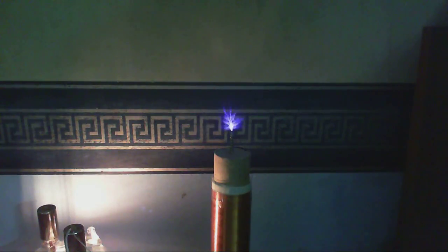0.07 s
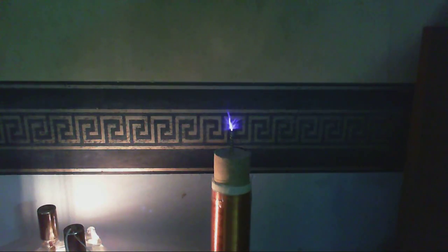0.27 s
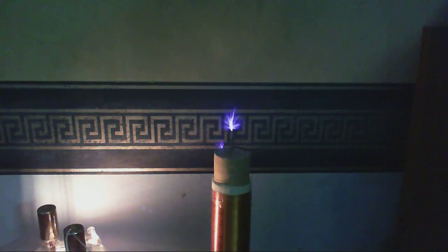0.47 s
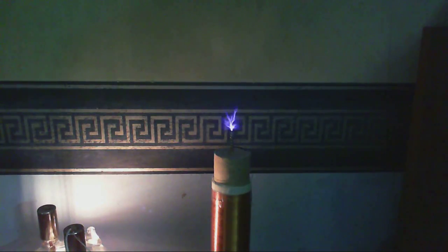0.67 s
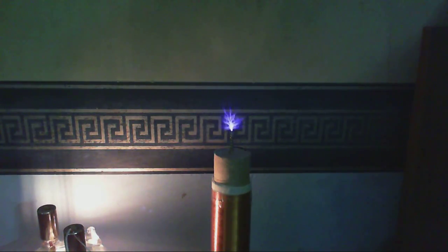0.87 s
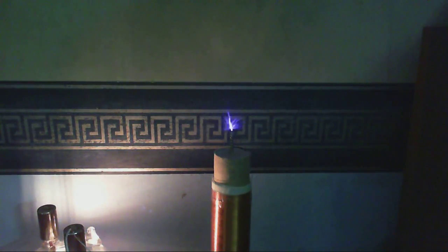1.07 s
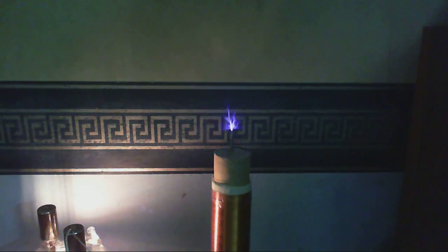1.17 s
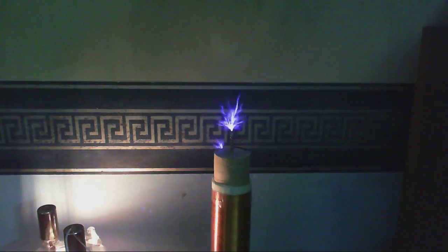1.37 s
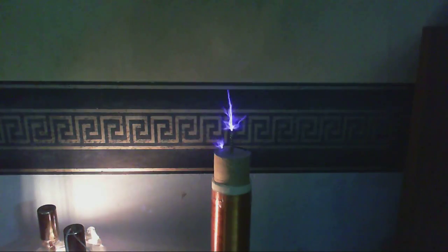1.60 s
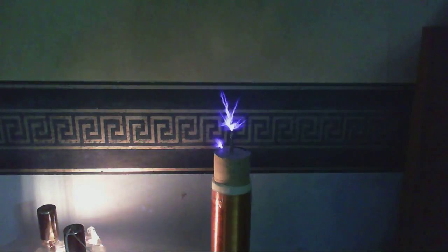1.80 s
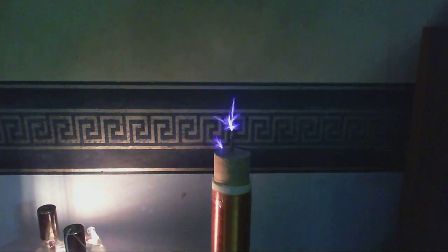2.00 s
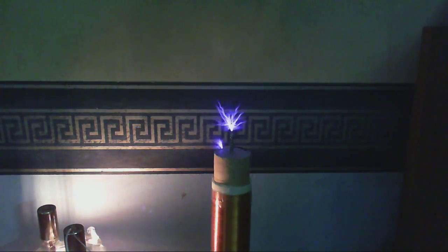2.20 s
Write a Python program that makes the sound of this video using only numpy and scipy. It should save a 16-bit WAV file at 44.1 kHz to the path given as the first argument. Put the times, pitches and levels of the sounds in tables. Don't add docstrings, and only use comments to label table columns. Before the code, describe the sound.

Continuous electrical buzzing and fizzing spark streamers, close to the microphone in a quiet workshop, are briefly broken by a hard, rattling switch click with a short room echo, then resume more strongly until the end.

```python
import sys
import numpy as np
from scipy import signal
from scipy.fft import rfft, irfft, next_fast_len
from scipy.io import wavfile
from scipy.ndimage import uniform_filter1d, map_coordinates

SR = 44100
rng = np.random.default_rng(int(sys.argv[2]) if len(sys.argv) > 2 else 0)


def to_wav(sig):
    pcm = np.clip(np.atleast_2d(sig), -1, 1) * 32767
    pcm = np.round(pcm).astype(np.int16)
    wavfile.write(sys.argv[1], SR, pcm.T)


def ratio_of_db(decibels):
    return 10 ** (np.asarray(decibels, float) / 20)


N = 99136
T = np.arange(N) / SR
MAINS_HZ = 49.88

# (on [s], off [s], instant the discharge cycles are counted from [s])
SETTINGS = [
    (-.1, 1.1362, -.00795),
    (1.169, 2.4, -.00531),
]
# (time [s], level [dB], rise [s], t60 [s])
SNAPS = [
    (1.1671, -11.5, 0.0018, .03),
    (1.17, -20.5, 0.0037, 0.034),
    (1.1734, -21.5, 0.00058, 0.024),
    (1.18, -24, .002, .06),
    (1.187, -27, 0.0019, .11),
]


def unit(x):
    return x / np.sqrt(np.mean(x ** 2) + 1e-20)


def along(points, hz):
    f, v = np.transpose(points)
    return np.interp(np.log(hz + 1), np.log(f + 1), v)


def filtered(x, response):
    m = next_fast_len(N + SR // 2)
    return irfft(rfft(x, m) * response(np.fft.rfftfreq(m, 1 / SR)), m)[:N]


def wobble(rate):
    knots = rng.standard_normal(int(N * rate / SR) + 4)
    return map_coordinates(knots, [T * rate])


def coloured_noise(spectrum, gain=1):
    return unit(filtered(gain * rng.standard_normal(N), lambda hz: ratio_of_db(along(spectrum, hz))))


def patchy(x, depth_db):
    z = signal.stft(x, nperseg=256)[2]
    field = uniform_filter1d(rng.standard_normal(z.shape), size=5, axis=0)
    field = uniform_filter1d(field, size=5, axis=1)
    return unit(signal.istft(z * ratio_of_db(depth_db * unit(field)), nperseg=256)[1][:N])


def resonances(table):
    def response(f):
        total = 0
        for k, (centre, wide, db) in enumerate(table):
            damping = 1j * f * wide
            total = total + (-1) ** k * ratio_of_db(db) * damping / (centre * centre - f * f + damping)
        return total
    return response


def burst(start, db, rise_s, t60_s, release=None):
    release = start if release is None else release
    fall = ratio_of_db(db - 60 * np.maximum(T - release, 0) / t60_s)
    return fall * (1 - np.exp(-np.maximum(T - start, 0) / rise_s))


def supply(levels_db, rise_s, t60_s):
    return sum(burst(on, db, rise_s, t60_s, off) for (on, off, _), db in zip(SETTINGS, levels_db))


def at_low_power():
    return T < SETTINGS[1][0] - .01


def cycles():
    return (T - np.where(at_low_power(), SETTINGS[0][2], SETTINGS[1][2])) * MAINS_HZ


def buzz():
    # (mains multiple, level [dB])
    low = [(1, 1), (2, 1.5), (3, -8), (4, -21.5), (5, -19.5), (6, -20.5), (7, -48), (8, -27.5), (9, -29),
           (10, -27.5), (11, -44), (12, -50), (13, -35), (14, -32.5)]
    high = [(1, -2), (2, 1), (3, -8), (4, -25.5), (5, -16), (6, -19.5), (7, -39), (8, -21.5), (9, -29),
            (10, -36), (11, -51), (12, -41), (13, -47), (14, -32.5)]
    swing_hz, swing_q = 112, 2.5
    levels_db, left_db = [-32.5, -27.5], -32.5

    def stack(rows):
        total = 0
        for k, db in rows:
            hz = k * MAINS_HZ
            lag = np.angle(swing_hz ** 2 - hz ** 2 + 1j * hz * swing_hz / swing_q)
            if k > 3 and k % 2 == 0:
                lag += np.pi
            upper = max(k - 3, 0)
            level = ratio_of_db(db + upper * 0.33 * wobble(11.86)) * np.sqrt(2)
            drift = upper * 0.054 * wobble(8.3)
            total = total + level * np.cos(2 * np.pi * k * cycles() - lag + drift)
        return total

    wave = np.where(at_low_power(), stack(low), stack(high))
    waver = ratio_of_db(0.35 * wobble(40.47)) + 0.012 * wobble(300)
    return wave * waver * (supply(levels_db, 0.0064, 0.0012) + ratio_of_db(levels_db[0] + left_db))


def streamers():
    # (frequency [Hz], level [dB per Hz])
    corona_colour = [(290, 4), (500, 1), (1050, -7.5), (2500, -11), (3540, -8.5), (4660, -7), (9360, -3),
                     (14900, -14), (16000, -43)]
    # (frequency [Hz], level [dB per Hz])
    spit_colour = [(290, -10), (500, -12), (740, -7), (819, -2.5), (1050, -7.5), (2500, -4.5),
                   (3540, -10.5), (9360, -4.5), (16000, -13)]
    # (frequency [Hz], level [dB per Hz])
    plasma_colour = [(15, -34), (25, -5), (107, -6), (168, -9.5), (198, -14), (252, -18), (900, -19),
                     (1170, -68), (1980, -120)]
    strike, rise, die = 0.089, 0.088, 0.32
    second_db, scatter_db, grain_db = -5.5, 1, 2.5

    halves = 2 * (cycles() - strike + 1)
    count = halves.astype(int)
    since = halves % 1 / 2
    scatter = rng.uniform(-2.1, 1, count.max() + 1)[count]
    size = ratio_of_db(scatter_db * scatter + second_db * (count % 2))
    flare = size * (1 - np.exp(-since / rise)) * np.exp(-since / die)

    spit = patchy(coloured_noise(spit_colour, flare * ratio_of_db(grain_db * wobble(1500))), 2)
    corona = patchy(coloured_noise(corona_colour), 1.5) * ratio_of_db(0.96 * wobble(7.96))
    plasma = coloured_noise(plasma_colour, 0.34 + unit(flare))
    return (spit * supply([-44.5, -42.5], 0.0027, 1e-3)
            + corona * supply([-43, -39], 0.0026, 0.037)
            + plasma * supply([-52.5, -50.5], .004, 0.017))


def arc():
    # (frequency [Hz], level [dB per Hz])
    crack_colour = [(500, -40), (900, -2.5), (1700, -2), (2500, -1.5), (3500, -10), (4700, -2.5),
                    (7000, -15.5), (12000, -35)]
    crack_at, crack_wide = .24, .08
    c = cycles() - crack_at + 1.514
    size = ratio_of_db(2 * rng.uniform(-1.6, 1, int(c.max()) + 1)[c.astype(int)])
    pulse = np.exp(-.5 * ((c % 1 - .5) / crack_wide) ** 2)
    return coloured_noise(crack_colour, size * pulse) * supply([-52.5, -50.5], .004, 1e-3)


def bench_colour(sparks):
    # (frequency [Hz], width [Hz], level [dB])
    bench_peaks = [(387, 42, -7.5), (840, 44, -5.5), (2494, 210, -9.5), (4660, 100, -6)]
    return filtered(sparks, lambda f: 1 + resonances(bench_peaks)(f) ** 2 * 4)


def quiet_room():
    # (frequency [Hz], level [dB per Hz])
    floor_colour = [(25, -16), (60, 3), (200, -14), (1000, -8), (4000, -14.5), (9000, -18), (16000, -40)]
    return ratio_of_db(-48.5) * coloured_noise(floor_colour)


def latch_tick():
    impulse = 1. * (np.arange(N + 1) == round(1.1639 * SR))
    return .07 * np.diff(impulse, n=1)


def switch():
    # (frequency [Hz], width [Hz], level [dB])
    case_peaks = [(2130, 37, -1.5), (2480, 174, 3), (3250, 160, -7), (6070, 300, -3), (6990, 130, -7),
                  (7580, 78, 2.5), (9000, 98, -10)]
    # (frequency [Hz], level [dB per Hz])
    body_colour = [(200, -27), (500, -7.5), (1000, -9), (2400, -5), (4200, -4.5), (7570, -3), (10500, -10),
                   (16300, -32)]
    # (frequency [Hz], level [dB], t60 [s])
    panel_modes = [(2182, -5, 0.22), (1540, -3, 0.16), (3235, -11, 0.09)]
    # (frequency [Hz], level [dB], t60 [s])
    thud_modes = [(320, 3, .1), (395, -4, .15), (610, 5, .08), (695, 2, .13), (775, -2, .13),
                  (838, -2, .15), (1090, 1, .1)]

    shake = sum(burst(*snap) for snap in SNAPS)
    t = np.maximum(T - SNAPS[0][0], 0)

    def case(f):
        return ratio_of_db(-5 + along(body_colour, f)) + resonances(case_peaks)(f)

    def ring(modes, level_db):
        return sum(ratio_of_db(level_db + db - 60 * t / t60) * np.sin(2 * np.pi * hz * t + wobble(29.74) / 2)
                   for hz, db, t60 in modes)

    rings = ring(panel_modes, -29) + ring(thud_modes, -34)
    return 4 * filtered(shake * rng.standard_normal(N), case) + rings * (1 - np.exp(-t / 0.0025))


def knob():
    # (frequency [Hz], level [dB], time to peak [s])
    knob_modes = [(2500, -20, .0035), (7600, -21, .004)]
    t = np.maximum(T - SNAPS[0][0], 0)
    total = 0
    for hz, db, peak_s in knob_modes:
        swell = (t / peak_s * np.exp(1 - t / peak_s)) ** 2
        total = total + ratio_of_db(db) * swell * np.sin(2 * np.pi * hz * t + wobble(250) / 2)
    return total


def room(x):
    # (frequency [Hz], t60 [s])
    decay_times = [(200, 0.41), (2000, 0.33), (10000, 0.12)]
    hz, t, z = signal.stft(rng.standard_normal(SR // 2), SR, nperseg=256)
    fade = ratio_of_db(-60 * t / along(decay_times, hz)[:, None])
    tail = signal.istft(z * fade, SR, nperseg=256)[1]
    late = np.pad(x, (200, 0))
    return signal.fftconvolve(late, tail / np.linalg.norm(tail))[:N]


def scene():
    air = bench_colour(streamers() + arc()) + quiet_room()
    snap = switch()
    wet = snap + ratio_of_db(-9.5) * room(snap) + knob()
    early = T < SETTINGS[1][0] + .008
    dulled = filtered(air + wet * ~early, lambda f: f < 15830)
    return (buzz() + dulled + wet * early + latch_tick())[None]


def band_limit(x):
    return signal.sosfilt(signal.butter(12, 16490, fs=SR, output="sos"), x)


def record(dry):
    mix = filtered(dry[0], lambda f: f < 16450)[None]
    return band_limit(mix)


dry = scene()
out = record(dry)
to_wav(out)
```